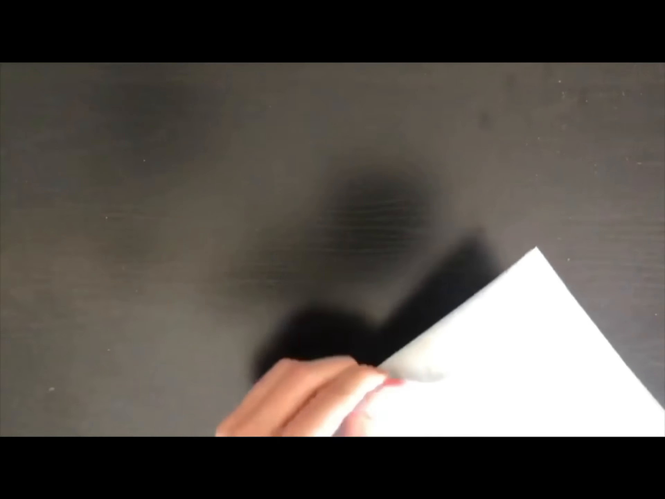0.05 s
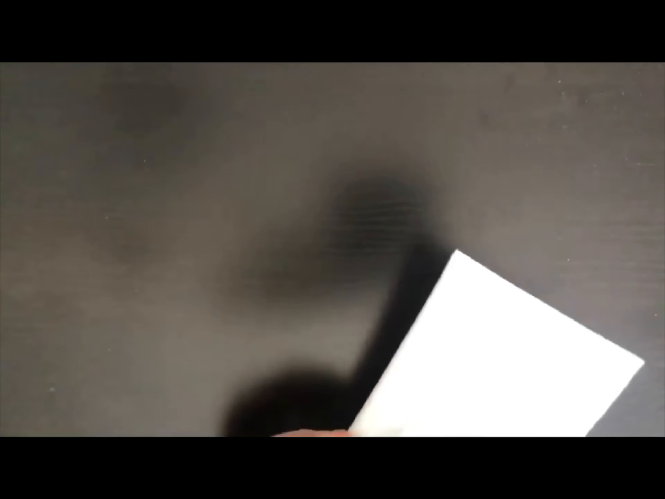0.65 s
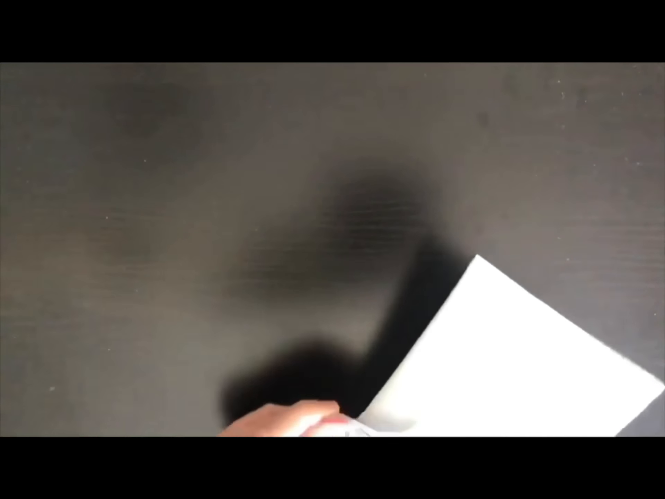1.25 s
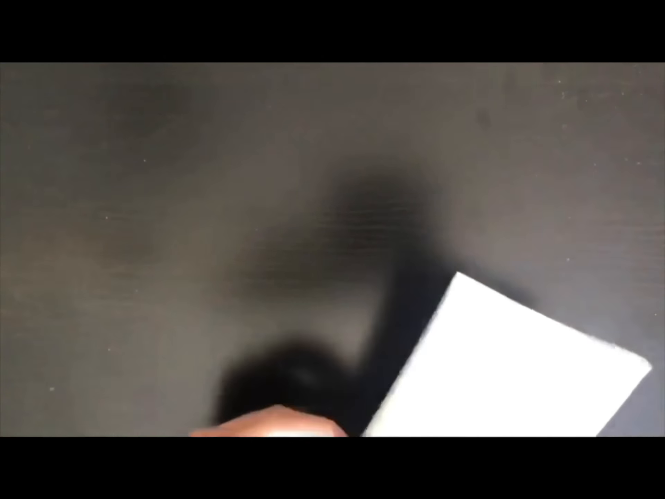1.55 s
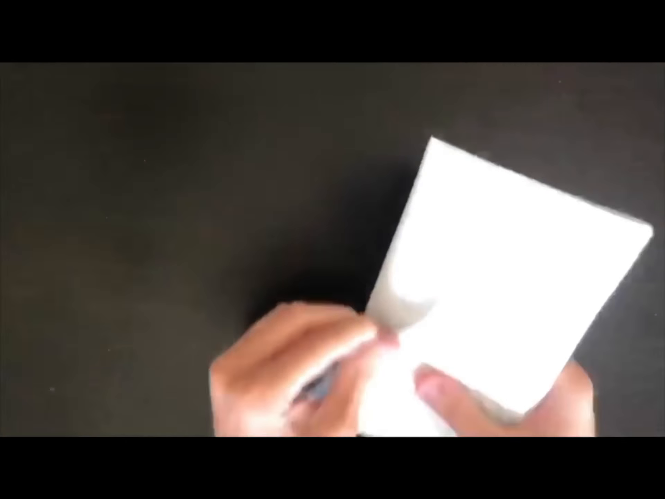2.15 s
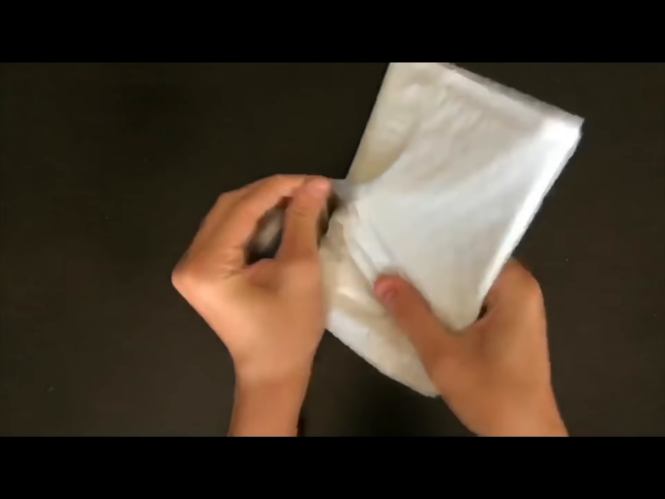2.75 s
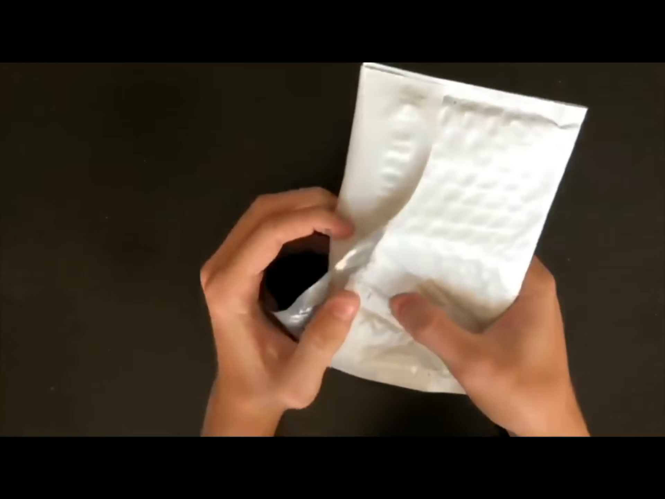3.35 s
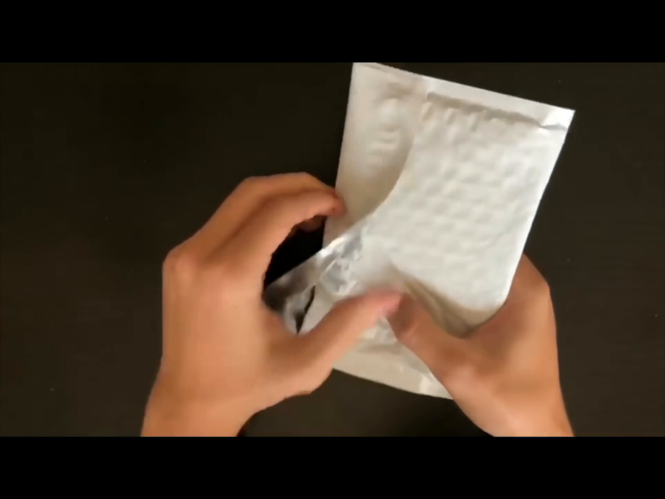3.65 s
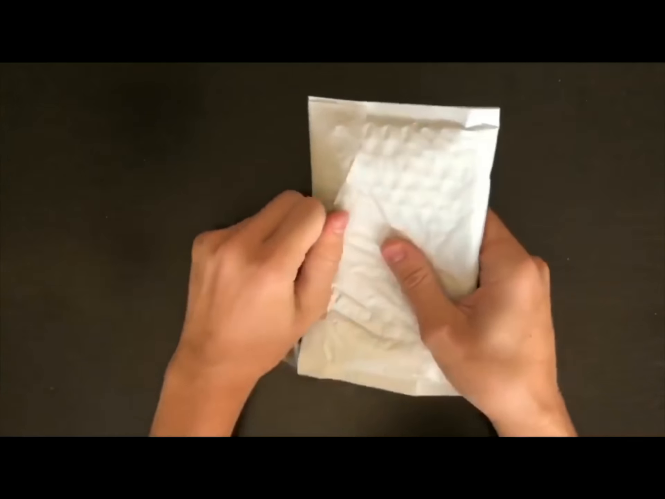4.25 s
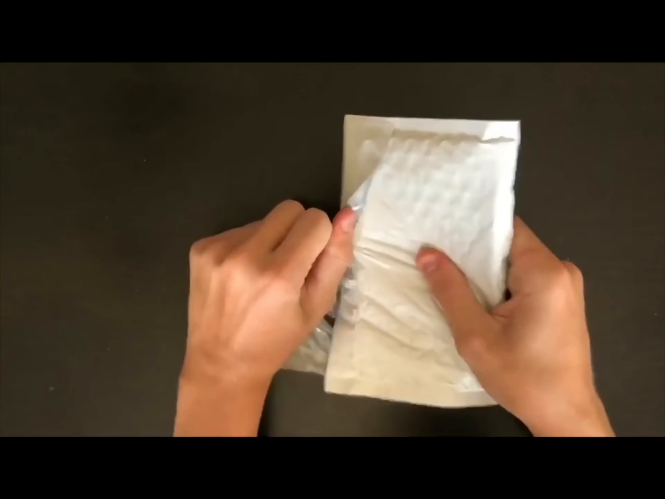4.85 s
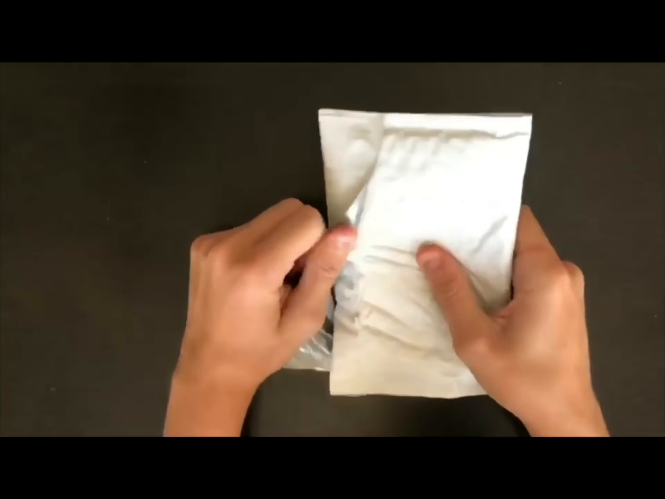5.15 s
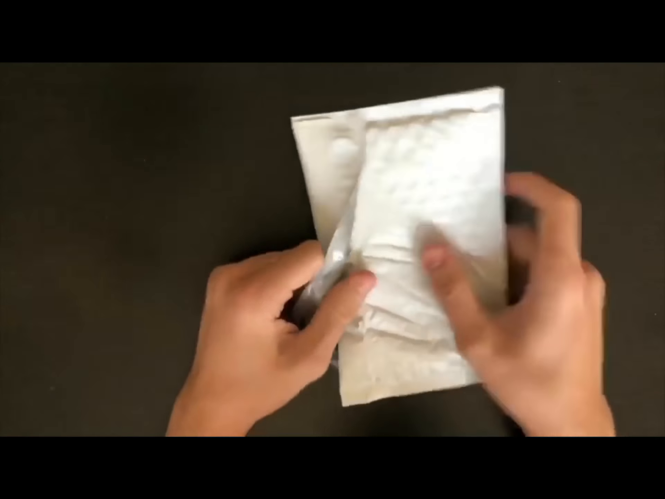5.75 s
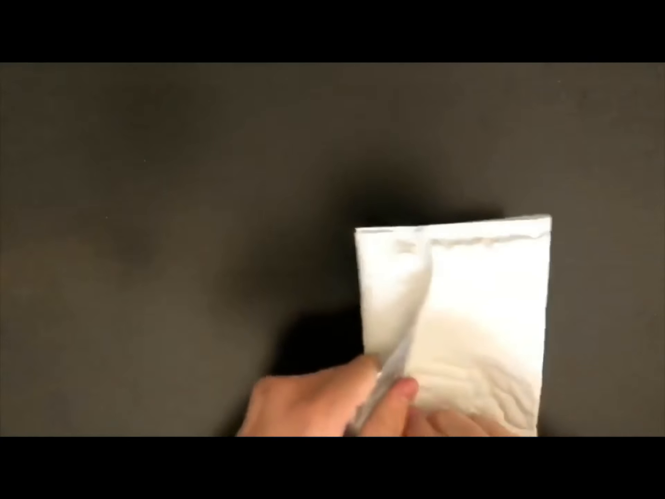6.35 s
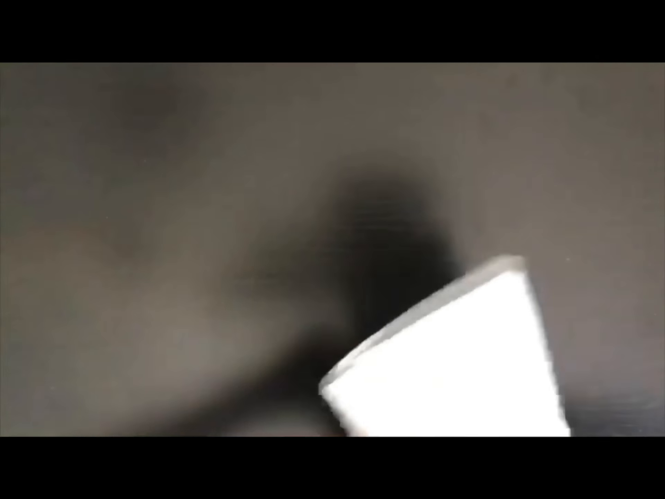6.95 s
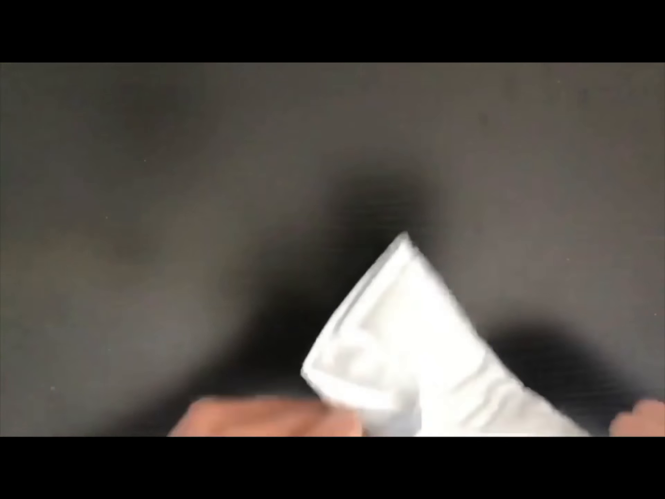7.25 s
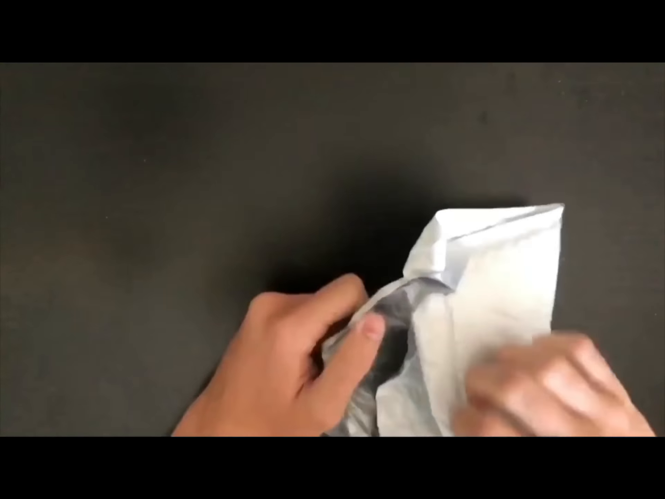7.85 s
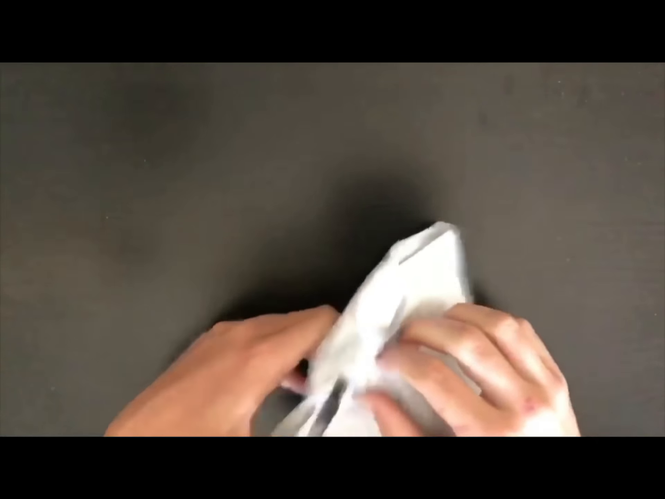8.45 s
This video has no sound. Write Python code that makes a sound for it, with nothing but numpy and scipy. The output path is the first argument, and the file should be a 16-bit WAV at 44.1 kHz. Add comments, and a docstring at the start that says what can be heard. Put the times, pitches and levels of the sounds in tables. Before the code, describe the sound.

Hands work a padded paper envelope open over a table, close to the microphone in a small room. Paper and plastic wrap rustle and crackle in uneven bursts, with sharp snaps as creases buckle and a few dull bumps. Early on, a finger sticks and slips on the plastic with a brief creak. The crinkling grows densest and loudest near the end. A faint low hum lies underneath.

```python
"""Opening a padded envelope

Two hands work a padded paper envelope open over a table and pull at its plastic wrap, in a small room.
The sheets rub and crackle, creases buckle with sharp snaps, the envelope flaps and bumps dully,
and a finger sticks and slips over the plastic. A faint hum lies underneath."""
import sys
import numpy as np
from scipy import signal
from scipy.fft import rfft, irfft
from scipy.io import wavfile
from scipy.ndimage import uniform_filter1d

SR = 44100
rng = np.random.default_rng(int(sys.argv[2]) if len(sys.argv) > 2 else 0)


def bounce(signal):
    """Save signal as a 16-bit WAV file at the path given by the first command-line argument."""
    frames = np.transpose(np.atleast_2d(signal))
    limited = np.clip(frames, -1, 1)
    pcm = np.round(limited * 32767).astype(np.int16)
    wavfile.write(sys.argv[1], SR, pcm)


N = 384111
TIME = np.arange(N) / SR


def from_db(db):
    """Decibels to gain."""
    return 10 ** (np.asarray(db) / 20)


def unit_rms(x):
    """Scale to rms 1."""
    return x / np.sqrt(np.mean(x ** 2) + 1e-20)


def unit_pulse(x):
    """Scale to the energy of 1 ms at rms 1."""
    return x * np.sqrt(SR / 1000 / (np.sum(x ** 2) + 1e-20))


def in_time(rows):
    """Interpolate each column linearly over time."""
    times_s, *columns = np.transpose(rows)
    return [np.interp(TIME, times_s, column) for column in columns]


def at_hz(points, hz):
    """Read a table on a log-frequency axis."""
    knots_hz, values = np.transpose(points)
    return np.interp(np.log(np.maximum(hz, 1)), np.log(knots_hz), values)


def add(out, at_s, sound):
    """Mix a sound in at a given time."""
    i = max(int(at_s * SR), 0)
    out[i:i + len(sound)] += sound[:max(N - i, 0)]


def band(x, low_hz, high_hz):
    """Butterworth band-pass."""
    sos = signal.butter(2, [low_hz, min(high_hz, 0.45 * SR)], "band", fs=SR, output="sos")
    return signal.sosfilt(sos, x)


def coloured(x, spectrum, size=4096):
    """Minimum-phase filter with the given spectrum; output rms 1."""
    gain = from_db(at_hz(spectrum, np.linspace(0, SR / 2, size // 2 + 1)))
    cepstrum = irfft(np.log(gain))
    response = irfft(np.exp(rfft(2 * cepstrum[:size // 2], size)))
    return unit_rms(signal.oaconvolve(x, response)[:N])


def drift(rate_hz):
    """Random piecewise-linear curve, rms 1."""
    knots = rng.standard_normal(int(N / SR * rate_hz) + 2)
    return unit_rms(np.interp(TIME * rate_hz, np.arange(len(knots)), knots))


def burst(t, white, decay_s, low_hz, high_hz):
    """Band of noise that swells quickly and dies away."""
    return unit_pulse(band(white * t * np.exp(-t / decay_s), low_hz, high_hz))


def bending_wave(t, hz, rise_s, decay_s, glide):
    """Damped flexing of the sheet; short waves travel faster, so the pitch falls."""
    t = np.maximum(t, 0)
    pitch_hz = hz * np.exp(glide * (np.exp(-t / (2 * decay_s)) - np.exp(-1 / 2)))
    phase = 2 * np.pi * np.cumsum(pitch_hz * (t > 0)) / SR
    envelope = (1 - np.exp(-t / rise_s)) * np.exp(-t / decay_s)
    return unit_pulse(envelope * np.sin(phase))


# air spectrum: (frequency [Hz], relative density [dB])
AIR_SPECTRUM = [(25, -23), (50, 2), (90, 3), (150, 6), (300, 1.5), (600, -5), (1100, 0.5), (2500, -8),
                (8000, -58), (16000, -36)]
# hum: (frequency [Hz], rms level [dB])
HUM_TONES = [(115.5, -63.5), (274.5, -72.5)]


def background(air_db=-62, waver_hz=0.84):
    """Room air and a slightly wavering hum."""
    waver = np.cumsum(waver_hz * drift(9)) / SR
    hum = sum(from_db(db) * np.sqrt(2) * np.sin(2 * np.pi * (hz * TIME + waver)) for hz, db in HUM_TONES)
    return hum + from_db(air_db) * coloured(rng.standard_normal(N), AIR_SPECTRUM)


# light finger rubbing: (time [s], plastic level [dB])
GRIP_LEVELS = [(0, -49), (0.3, -48), (0.5, -56.5), (0.8, -54), (0.96, -59.5), (1.25, -48), (1.67, -55.5),
               (2.03, -65), (2.11, -57.5), (2.16, -49.5), (3.25, -44.5), (3.93, -61.5), (4.15, -51.5),
               (4.65, -48.5), (5.2, -53.5), (5.8, -53.5), (6.22, -65.5), (6.62, -46.5), (7.95, -45.5)]
# pulls and shifts of the hands: (time [s], hold [s], plastic level [dB], paper re plastic [dB])
HAND_PULLS = [(0.411, 0.01, -45, 12), (0.828, 0.0062, -45.5, 0.5), (1.2, 0.088, -49, -2.5),
              (1.421, 0.02, -37, -6), (1.51, 0.028, -35, -6.5), (1.722, 0.19, -47, -4),
              (1.9, 0.074, -50, 7.5), (2.194, 0.031, -50.5, 6), (2.35, 0.043, -47.5, -3),
              (2.5, 0.18, -49, 2), (2.8, 0.023, -42.5, -6), (2.95, 0.027, -40, -5),
              (3.016, 0.011, -25.5, 2.5), (3.16, 0.26, -56, 3), (3.69, 0.053, -49.5, -2.5),
              (3.981, 0.0068, -47, -5), (4.08, 0.13, -62.5, 10), (4.299, 0.094, -39, -2.5),
              (4.451, 0.096, -44, -1), (4.87, 0.17, -48.5, -0.5), (5.1, 0.013, -41.5, -2),
              (5.275, 0.015, -48, 2.5), (5.359, 0.075, -48, -2.5), (5.624, 0.0088, -37, -2),
              (5.74, 0.0033, -47, 11), (5.859, 0.0079, -45.5, 6.5), (5.975, 0.025, -46, 0.5),
              (6.335, 0.056, -50, -1.5), (6.42, 0.049, -47, -1), (6.546, 0.0092, -40.5, 0),
              (6.768, 0.035, -36.5, -2.5), (6.8, 0.14, -49, 7.5), (7.14, 0.02, -34.5, -4.5),
              (7.18, 0.1, -32, -4), (7.335, 0.029, -31.5, -1), (7.412, 0.006, -28.5, -0.5),
              (7.58, 0.052, -37.5, -5), (7.662, 0.062, -26.5, -4.5), (7.77, 0.13, -39, -4.5),
              (8.099, 0.0057, -42, -4), (8.25, 0.089, -39.5, -3), (8.445, 0.011, -39, -0.5),
              (8.5, 0.019, -40, -2)]
NOMINAL_DB = -47


def handling(attack_db_per_s=798, hold_db_per_s=1, release_db_per_s=276,
             strain_db_per_s=2500, settle_db_per_s=268):
    """Paper and plastic levels in dB: grip, pulls and the rustle around each snap add in power."""
    grip_db, = in_time(GRIP_LEVELS)
    paper_power, plastic_power = from_db(grip_db - 3) ** 2, from_db(grip_db) ** 2
    t = np.arange(-SR // 10, SR // 2) / SR
    before_s = np.minimum(t, 0)
    for at_s, hold_s, db, paper_offset_db in HAND_PULLS:
        pull_db = db + attack_db_per_s * before_s + hold_db_per_s * np.clip(t, 0, hold_s)
        pull_db -= release_db_per_s * np.maximum(t - hold_s, 0)
        add(plastic_power, at_s + t[0], from_db(pull_db) ** 2)
        add(paper_power, at_s + t[0], from_db(pull_db + paper_offset_db) ** 2)
    around_db = strain_db_per_s * before_s - settle_db_per_s * np.maximum(t, 0)
    for at_s, _, panel_db, _, crack_db, _ in CREASE_SNAPS:
        add(paper_power, at_s + t[0], from_db(panel_db - 25 + around_db) ** 2)
        add(plastic_power, at_s + t[0], from_db(crack_db - 29.5 + around_db) ** 2)
    return 10 * np.log10([paper_power, plastic_power])


def crackle(per_s, spread_db, grain_s=0.00024):
    """Amplitude envelope of countless tiny, uneven creases, levelled over 36 ms."""
    onsets = rng.random(N) < per_s * from_db(3 * drift(40)) / SR
    power = onsets * from_db(spread_db * np.minimum(rng.exponential(1, N), 3.3)) ** 2
    pole = np.exp(-1 / (grain_s * SR))
    power = signal.lfilter([1], [1, -2 * pole, pole ** 2], power + 1e-9)
    local_power = uniform_filter1d(power, size=1600) + 0.047 * np.mean(power)
    return np.sqrt(power / local_power)


def shifting(x, low_hz, high_hz, depth_db, rate_hz, bands=9):
    """The handled sheet changes shape, so its resonances wander: each band swells on its own."""
    out = 0
    for hz in np.geomspace(low_hz, high_hz, bands):
        low = signal.sosfiltfilt(signal.butter(4, hz, fs=SR, output="sos"), x)
        out = out + low * from_db(depth_db * drift(rate_hz))
        x = x - low
    return unit_rms(out + x)


def bent(x, octaves=0.17, rate_hz=9):
    """Bending stiffens and slackens the paper, so its resonances slide together."""
    speed = 2 ** (octaves * drift(rate_hz))
    return np.interp(np.cumsum(speed) % N, np.arange(N), x)


# material spectra: (frequency [Hz], relative density [dB])
PADDING_SPECTRUM = [(25, -36), (50, -19), (110, -4.5), (170, -2), (300, 0), (450, -1.5), (650, -13),
                    (1200, -42.5)]
PAPER_SPECTRUM = [(250, -26.5), (500, -7.5), (750, 0), (980, 3.5), (1250, 2.5), (1500, -5), (1900, -0.5),
                  (2400, -2), (4000, -48)]
PLASTIC_SPECTRUM = [(1200, -21), (2100, -3), (2700, 2.5), (4200, 2), (5500, 1.5), (7000, -2.5),
                    (9000, -3.5), (12000, -7), (16000, -9.5)]
# sizzle of taut film: (time [s], level re plastic rustle [dB])
FILM_SIZZLE = [(0.5, -31), (1.5, -5), (2.3, -19), (2.6, -9), (3.05, -15), (4.3, -15), (5.0, -26),
               (6.8, -35), (7.33, -11), (7.7, -8), (8.0, -20)]


def rustle(friction=0.57, padding_follow=0.77, padding_max_db=-49):
    """Crackle over smooth friction, heard through padding, paper and plastic; taut film adds sizzle."""
    paper_db, plastic_db = handling()
    padding_db = np.minimum(-61.5 + padding_follow * (paper_db - NOMINAL_DB), padding_max_db)
    sizzle_db, = in_time(FILM_SIZZLE)
    texture = np.hypot(crackle(per_s=1000, spread_db=5.5), friction)
    noise = rng.standard_normal((4, N)) * texture
    sheet = shifting(noise[1], 610, 3500, depth_db=4.5, rate_hz=35)
    film = shifting(noise[2], 2280, 11000, depth_db=3.5, rate_hz=80)
    sizzle = from_db(sizzle_db) * unit_rms(band(noise[3], 6300, 15000))
    padding = from_db(padding_db) * coloured(noise[0], PADDING_SPECTRUM)
    paper = from_db(paper_db) * bent(coloured(sheet, PAPER_SPECTRUM))
    plastic = from_db(plastic_db) * (coloured(film, PLASTIC_SPECTRUM) + sizzle)
    return padding + paper + plastic + small_creases(paper_db, plastic_db)


def small_creases(paper_db, plastic_db, per_s=28, boost_db=7, spread_db=1.4, tries=500, pitches=40):
    """Tiny folds give at random, louder and more often with firmer handling."""
    out, t = np.zeros(N), np.arange(500) / SR
    paper_folds = [crinkle(t, hz) for hz in np.geomspace(700, 1900, pitches)]
    plastic_folds = [crinkle(t, hz) for hz in np.geomspace(2400, 9000, pitches)]
    for when, strength, paper_pick, plastic_pick, chance in rng.random((tries, 5)):
        i = int(when * N)
        firmness_db = min(plastic_db[i] - NOMINAL_DB, 4)
        if chance * tries < per_s * N / SR * from_db(0.36 * firmness_db):
            paper = from_db(min(paper_db[i], -44)) * paper_folds[int(paper_pick * pitches)]
            plastic = from_db(min(plastic_db[i], -42)) * plastic_folds[int(plastic_pick * pitches)]
            accent_db = boost_db + spread_db * min(-np.log(1 - strength), 2)
            add(out, i / SR, from_db(accent_db) * (paper + plastic))
    return out


def crinkle(t, hz, cycles=1.63, band_ratio=1.295):
    """One small fold gives: a broad click and a rough ring of a few cycles."""
    white = rng.standard_normal((2, len(t)))
    decay_s = cycles / hz
    ring = bending_wave(t, hz, rise_s=0.0003, decay_s=decay_s, glide=0.27)
    ring += 0.89 * burst(t, white[0], decay_s, hz / band_ratio, hz * band_ratio)
    click = burst(t, white[1], 0.00025, hz / 4, min(hz * 3, 14000))
    return unit_pulse(unit_pulse(ring) + 0.68 * click)


# small folds: (time [s], pitch [Hz], level over 1 ms [dB])
SMALL_FOLDS = [(0.044, 3780, -31), (0.633, 870, -31.5), (0.8673, 990, -34), (1.058, 3820, -25.5),
               (1.1063, 5040, -26), (1.2927, 6520, -32.5), (1.412, 6640, -23), (1.4161, 4300, -29),
               (1.542, 4300, -25.5), (1.6184, 5950, -28.5), (1.8902, 3980, -26), (1.996, 1200, -29),
               (2.1817, 9500, -33), (2.389, 5500, -25), (2.5147, 7000, -25), (2.5323, 13000, -22.5),
               (2.8445, 7900, -30), (2.9811, 12900, -19), (3.1887, 5250, -31.5), (3.2677, 4410, -26.5),
               (3.5082, 4040, -27.5), (3.5231, 7300, -25), (3.7755, 2480, -22), (4.1414, 2530, -28),
               (4.3383, 4560, -28), (4.3597, 3790, -26), (4.6027, 3510, -34), (4.762, 5650, -29),
               (4.8074, 1470, -28), (5.1183, 4130, -30), (5.136, 3790, -36), (5.236, 780, -33),
               (5.2406, 4800, -33.5), (5.465, 1300, -31.5), (6.1935, 2900, -32.5), (6.2893, 990, -31),
               (6.481, 1810, -28), (6.519, 955, -29), (6.5465, 9300, -22), (6.584, 8610, -29.5),
               (7.132, 5400, -20), (7.194, 4700, -17.5), (7.2274, 3510, -23), (7.5445, 6330, -28),
               (7.618, 9500, -14), (7.6224, 9000, -20), (7.694, 10300, -13), (7.8275, 4520, -28),
               (7.957, 6660, -28), (8.0983, 2760, -27), (8.152, 4480, -31), (8.3487, 2900, -30),
               (8.502, 2970, -30), (8.5319, 2650, -28), (8.5459, 6590, -26.5), (8.6063, 9000, -24),
               (8.6511, 2630, -23.5), (8.6692, 6240, -28)]


def crinkles():
    """Single folds give and stand out from the rustle."""
    out, t = np.zeros(N), np.arange(500) / SR
    for at_s, hz, db in SMALL_FOLDS:
        add(out, at_s, from_db(db) * crinkle(t, hz))
    return out


# buckling creases, levels over 1 ms:
# (time [s], panel pitch [Hz], panel level [dB], crack pitch [Hz], crack level [dB], tick level [dB])
CREASE_SNAPS = [(0.3594, 980, -33.5, 4900, -35, -29.5), (0.405, 890, -13.5, 3060, -20.5, -25),
                (0.4102, 940, -19, 4000, -23, -20), (1.111, 1290, -21.5, 4500, -21.5, -42),
                (1.234, 860, -36, 4300, -25.5, -42), (1.488, 1470, -49, 4000, -23, -16),
                (1.492, 1720, -27, 2730, -13, -18), (1.5002, 1260, -39, 4900, -13.5, -15),
                (1.794, 1510, -33, 5100, -28.5, -36), (1.8637, 1060, -27, 5840, -23, -19),
                (1.8968, 1030, -19, 3640, -30, -27), (1.93, 1110, -15, 2800, -16, -22),
                (2.308, 830, -25.5, 3300, -26.5, -27), (2.3585, 1280, -28.5, 4300, -29, -26),
                (2.3665, 1290, -29.5, 2600, -25.5, -46), (2.451, 790, -37.5, 4070, -27.5, -51),
                (2.9087, 800, -27.5, 3470, -25, -29.5), (2.9573, 1040, -28.5, 3240, -22, -38),
                (2.9701, 1520, -47, 3760, -7.5, -24), (2.9986, 1230, -30, 4400, -22, -16),
                (3.0003, 1020, -16.5, 4500, -9.5, -15), (3.3117, 1170, -25.5, 3730, -32, -42),
                (3.355, 1410, -25, 3520, -32, -33.5), (3.769, 1084, -6.5, 4100, -14, -28),
                (4.0806, 800, -32.5, 3900, -27.5, -30.5), (4.149, 1050, -27, 3060, -36, -49),
                (4.38, 930, -30, 3080, -29, -29), (4.472, 1610, -16.5, 3900, -21.5, -46),
                (4.652, 1120, -30, 4050, -29, -50), (4.674, 1390, -22, 3770, -28.5, -35),
                (4.8542, 1130, -28.5, 3000, -24, -43), (4.8814, 1350, -31, 3420, -28, -41),
                (4.889, 1680, -23, 5300, -24, -26), (4.903, 1750, -16, 3320, -17, -27),
                (4.9442, 1300, -31, 4950, -29, -34), (4.9888, 1340, -33, 3370, -29, -28.5),
                (5.0094, 1390, -23.5, 3470, -25, -30), (5.0306, 1680, -16, 2530, -24, -21.5),
                (5.099, 1390, -23.5, 5230, -28.5, -31), (5.4078, 716, -25, 3650, -20, -25.5),
                (5.632, 990, -12.5, 3180, -14.5, -16), (5.638, 900, -12, 3900, -14.5, -18),
                (5.764, 1070, -28, 2300, -31, -52), (6.3223, 960, -22, 5030, -32, -50),
                (6.407, 1250, -28.5, 5100, -24, -55), (6.4295, 1080, -30, 2930, -33, -45),
                (6.539, 1050, -26.5, 5430, -26, -25), (6.6581, 900, -32.5, 5120, -32.5, -37),
                (6.723, 1790, -24, 5100, -21.5, -26), (6.846, 1860, -24.5, 3970, -29, -29.5),
                (7.21, 1140, -36, 2840, -23, -19), (7.255, 1130, -23.5, 3960, -25, -19.5),
                (7.3065, 1190, -23, 4940, -17, -18), (7.323, 1180, -13.5, 4300, -18, -9.5),
                (7.399, 770, -24.5, 5350, -17, -16), (7.5392, 1040, -23, 2900, -34, -42),
                (7.5702, 670, -21, 4130, -11.5, -13), (7.6083, 578, -26.5, 4500, -25, -17),
                (7.6375, 680, -27, 4940, -19, -15), (7.661, 1560, -32, 4340, -17, -13),
                (7.664, 820, -25, 4600, -14.5, -9), (7.6783, 1150, -25, 3530, -14, -20),
                (7.6818, 1250, -20.5, 3970, -19, -20), (8.103, 970, -19.5, 4870, -23, -39),
                (8.296, 1220, -27, 3400, -22.5, -25), (8.4464, 990, -20, 2900, -25.5, -30)]


def snaps(panel_lag_s=0.0003, strain_gain=0.25):
    """A crease strains, gives with a bright tick and a crack, then the panel around it rings lower."""
    out, t = np.zeros(N), np.arange(1000) / SR
    for at_s, panel_hz, panel_db, crack_hz, crack_db, tick_db in CREASE_SNAPS:
        white = rng.standard_normal((4, len(t)))
        panel = bending_wave(t - panel_lag_s, panel_hz, rise_s=0.00054, decay_s=0.0011, glide=0.29)
        panel = unit_pulse(panel + 0.46 * burst(t, white[0], 0.0023, panel_hz / 2, panel_hz * 1.93))
        crack = bending_wave(t, crack_hz, rise_s=0.00036, decay_s=0.0005, glide=0.9)
        crack = unit_pulse(crack + 0.76 * burst(t, white[1], 0.00076, crack_hz / 2, crack_hz * 2))
        brightness = 2 ** (min(tick_db + 25, 18) / 40)
        tick = burst(t, white[2], 0.00022, 5200 * brightness, min(12500 * brightness, 15000))
        add(out, at_s, from_db(panel_db) * panel + from_db(crack_db) * crack + from_db(tick_db) * tick)
        strain = burst(t, white[3], 0.00098, 370, 17000)[::-1]   # fibres give faster and faster
        add(out, at_s + panel_lag_s - t[-1], strain_gain * from_db(max(crack_db, tick_db)) * strain)
    return out


# flaps: (time [s], centre [Hz], level [dB], decay [s])
ENVELOPE_FLAPS = [(0.407, 780, -23, 0.0099), (1.931, 1010, -41, 0.012), (3.771, 1290, -40, 0.014)]


def flaps(band_ratio=1.94, shiver_db=-19, shiver_s=0.07):
    """The whole envelope flaps: many panels sound at once, then shiver on faintly."""
    out, t = np.zeros(N), np.arange(SR // 3) / SR
    for at_s, hz, db, decay_s in ENVELOPE_FLAPS:
        panels = unit_rms(band(rng.standard_normal(len(t)), hz / band_ratio, hz * band_ratio))
        fade = np.exp(-t / decay_s) + from_db(shiver_db) * np.exp(-t / shiver_s)
        add(out, at_s, from_db(db) * panels * fade)
    return out


# bumps against hand and table: (time [s], centre [Hz], level [dB], decay [s])
ENVELOPE_BUMPS = [(0.411, 183, -29.5, 0.0071), (0.41, 55, -57, 0.045), (1.935, 141, -40, 0.015),
                  (2.7, 55, -63, 0.27), (2.67, 288, -54.5, 0.28), (2.792, 270, -58, 0.077),
                  (3.013, 190, -36, 0.013), (3.769, 340, -31, 0.0094), (4.176, 230, -52, 0.024),
                  (4.369, 242, -41.5, 0.014), (4.99, 239, -51.5, 0.084), (5.641, 234, -32, 0.0039),
                  (6.013, 296, -42.5, 0.021), (6.947, 302, -35, 0.0032), (7.325, 324, -37, 0.055),
                  (7.41, 149, -40, 0.012), (7.666, 345, -31.5, 0.04), (8.205, 139, -45.5, 0.012)]


def bumps():
    """The air-filled padding gives a short, low puff."""
    out, t = np.zeros(N), np.arange(SR // 3) / SR
    for at_s, hz, db, decay_s in ENVELOPE_BUMPS:
        puff = band(rng.standard_normal(len(t)) * np.exp(-t / decay_s), hz / 1.58, hz * 1.57)
        puff *= np.sqrt(decay_s * SR / np.sum(puff ** 2))
        add(out, at_s, from_db(db) * puff)
    return out


# finger on plastic: (time [s], slip rate [1/s], slip level [dB])
FINGER_SLIPS = [(2.455, 145, -56), (2.475, 172, -32), (2.53, 128, -33.5), (2.57, 140, -30.5),
                (2.62, 160, -54), (2.66, 300, -43), (2.69, 670, -41), (2.73, 590, -55), (2.78, 430, -46),
                (2.80, 530, -43), (2.84, 730, -37), (2.865, 690, -66)]


def judder(resonance_hz=(3850, 5500), tick_hz=(8100, 12300), jitter=0.018):
    """A finger sticks and slips, flicking one resonance of the taut film; it speeds up into a creak."""
    per_s, slip_db = in_time(FINGER_SLIPS)
    slip_count = np.floor(np.cumsum(per_s * (1 + jitter * drift(200))) / SR)
    sliding = (TIME > FINGER_SLIPS[0][0]) & (TIME < FINGER_SLIPS[-1][0])
    slips = np.diff(slip_count, prepend=0) * sliding * from_db(slip_db + drift(120))
    impulse = signal.unit_impulse(300)
    flick = unit_pulse(band(impulse, *resonance_hz)) + 0.64 * unit_pulse(band(impulse, *tick_hz))
    return signal.oaconvolve(slips, unit_pulse(flick))[:N]


# swishing or hollow strokes: (time [s], length [s], start [Hz], end [Hz], width [Hz], level [dB])
SHEET_STROKES = [(2.573, 0.17, 4250, 4440, 600, -46), (2.784, 0.05, 3620, 4280, 2040, -36),
                 (3.397, 0.33, 1260, 1093, 163.6, -53.5), (5.707, 0.07, 909, 1060, 109.6, -39),
                 (6.077, 0.22, 1300, 1390, 129.3, -54), (6.82, 0.063, 2086, 1850, 728, -38),
                 (6.878, 0.038, 1665, 1567, 255, -32), (6.881, 0.041, 800, 715, 374, -31)]


def strokes(catch_db=5.5):
    """Friction catches and lets go, driving one gliding resonance of the bent sheet."""
    out, grip = np.zeros(N), from_db(catch_db * drift(200))
    for at_s, length_s, start_hz, end_hz, width_hz, db in SHEET_STROKES:
        n = int(length_s * SR)
        phase = 2 * np.pi * np.cumsum(np.linspace(start_hz, end_hz, n)) / SR
        resonance = drift(2 * width_hz)[:n] * np.cos(phase) + drift(2 * width_hz)[:n] * np.sin(phase)
        swish = unit_rms(resonance * grip[int(at_s * SR):][:n])
        add(out, at_s, from_db(db) * swish * np.sin(np.linspace(0, np.pi, n)))
    return out


# decay curve knots, read only at band centres: (frequency [Hz], T60 [s])
ROOM_DECAY = [(150, 1.5), (500, -0.1), (1300, 0.4), (3000, 1), (15000, 0.16)]
# reflection spectrum: (frequency [Hz], relative density [dB])
ROOM_SPECTRUM = [(80, 2), (400, -6.5), (1100, 0.5), (3000, -6.5), (8000, -4.5), (16000, -3)]


def room(x, predelay_s=0.0062, uneven_db=7, early_gain=3.2, early_s=0.043):
    """Uneven early reflections smooth into a short tail that dies band by band."""
    t = np.arange(SR // 2) / SR
    echoes = rng.standard_normal((2, len(t))) * (t > predelay_s)
    echoes *= from_db(uneven_db * drift(1513)[:len(t)] * np.exp(-t / 0.054))
    edges_hz = np.geomspace(80, 18000, 12)
    tail = 0
    for k, (low_hz, high_hz) in enumerate(zip(edges_hz, edges_hz[1:])):
        hz = np.sqrt(low_hz * high_hz)
        level_db = at_hz(ROOM_SPECTRUM, hz) - 60 * t / at_hz(ROOM_DECAY, hz)
        tail = tail + band(echoes[k % 2], low_hz, high_hz) * from_db(level_db)
    tail *= 1 + early_gain * np.exp(-t / early_s)
    return signal.oaconvolve(x, tail / np.sqrt(np.sum(tail ** 2)))[:N]


def scene(hits_send_db=-13, rubbing_send_db=-14):
    """The envelope close by, the room around it; mono."""
    hits = snaps() + crinkles() + judder() + bumps() + flaps()
    rubbing = rustle() + strokes()
    reverb = room(from_db(hits_send_db) * hits + from_db(rubbing_send_db) * rubbing)
    return (hits + rubbing + reverb + background())[None]


def record(dry):
    """Soft clip, then a steep 16 kHz low-pass."""
    rounded = 1.35 * np.tanh(dry / 1.237)
    return signal.sosfiltfilt(signal.ellip(10, 0.05, 60, 16000, fs=SR, output="sos"), rounded)


dry = scene()
out = record(dry)
bounce(out)
```